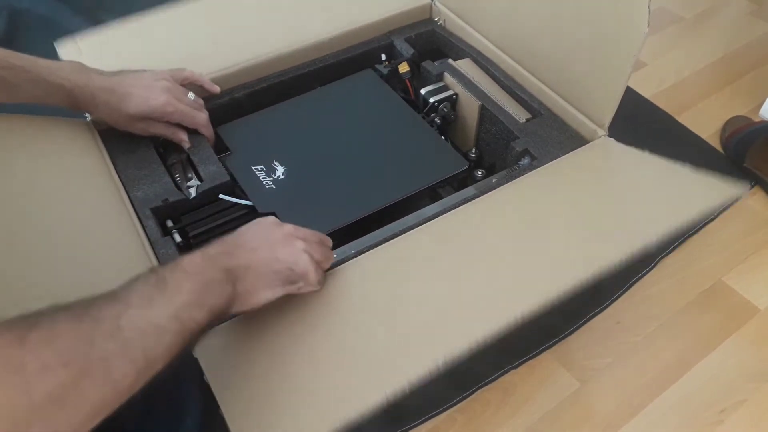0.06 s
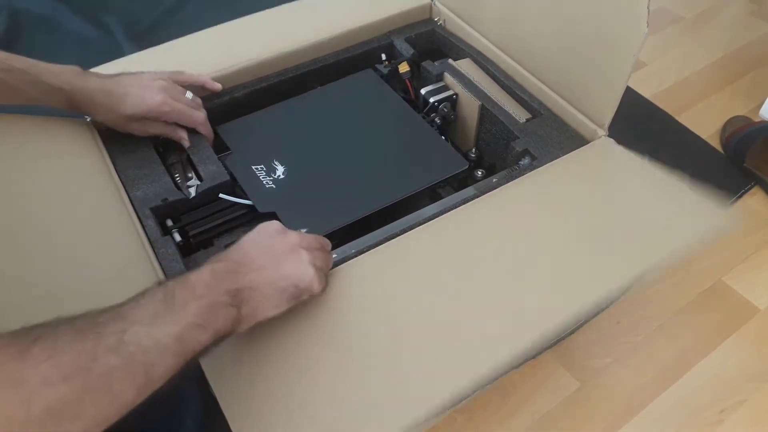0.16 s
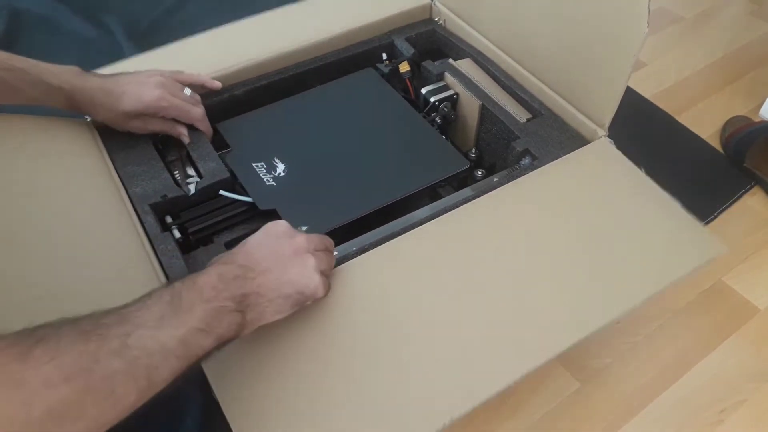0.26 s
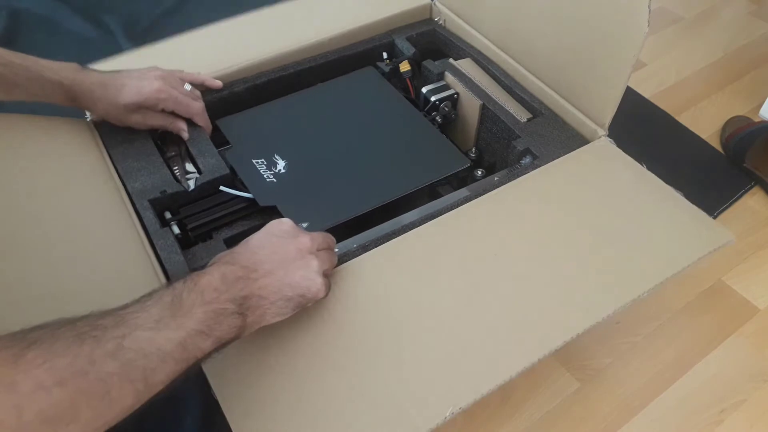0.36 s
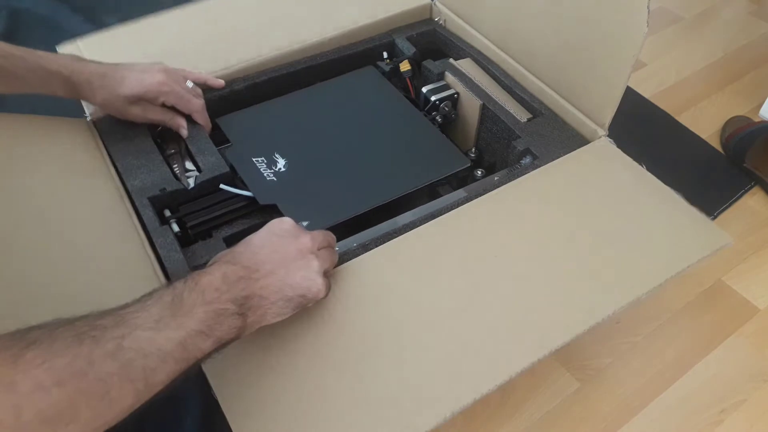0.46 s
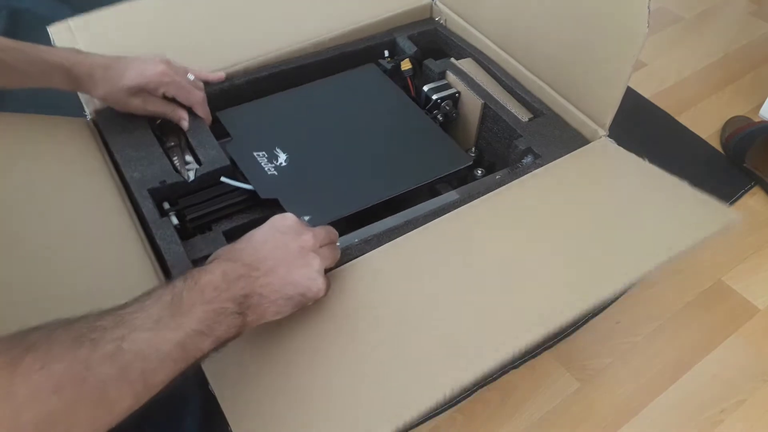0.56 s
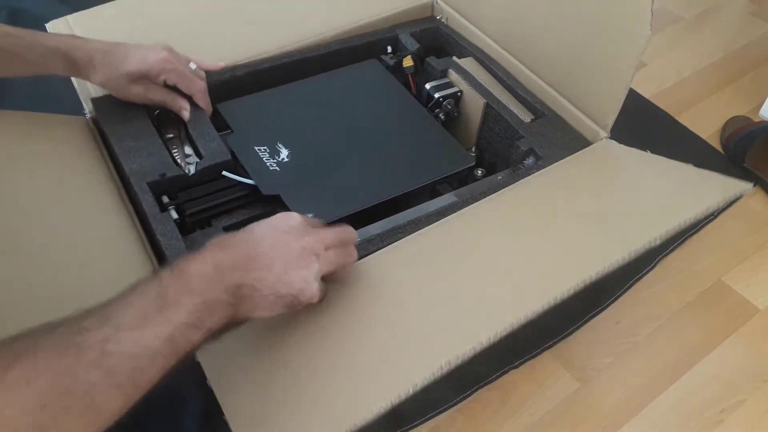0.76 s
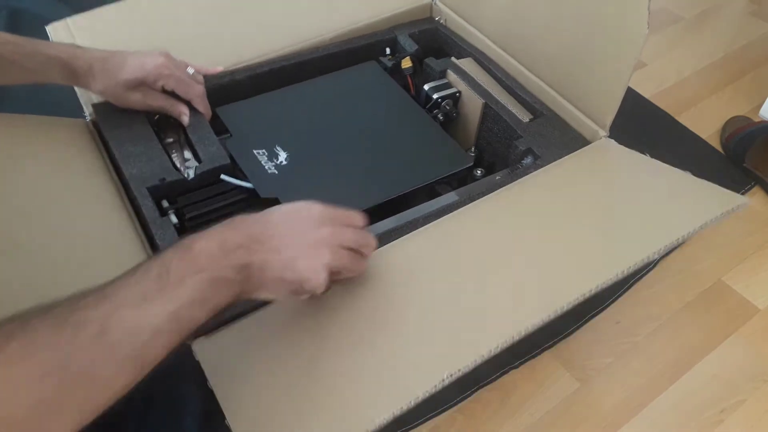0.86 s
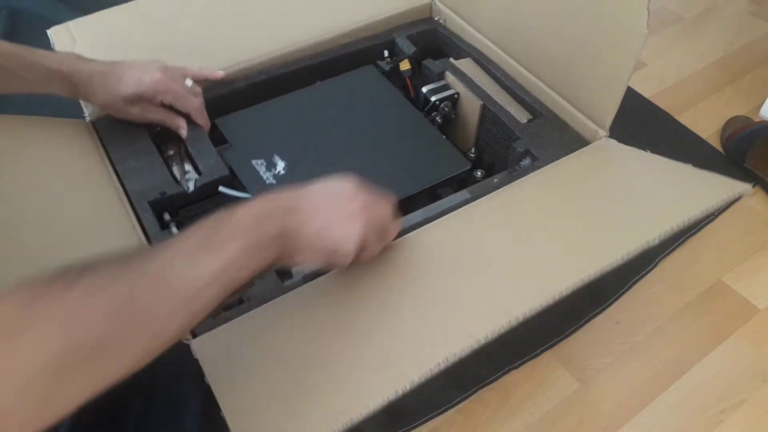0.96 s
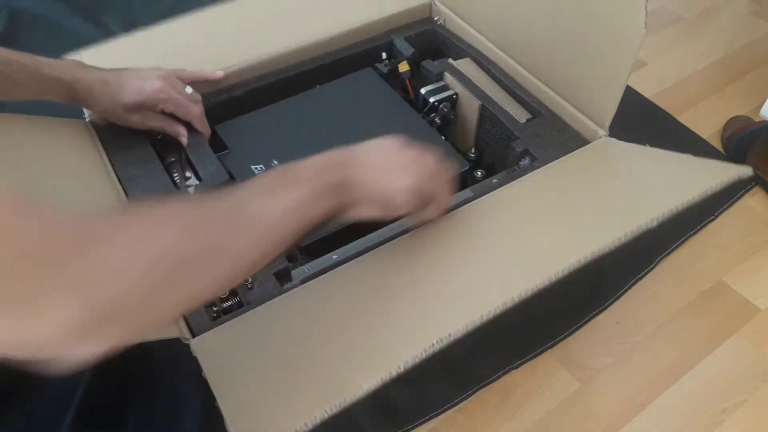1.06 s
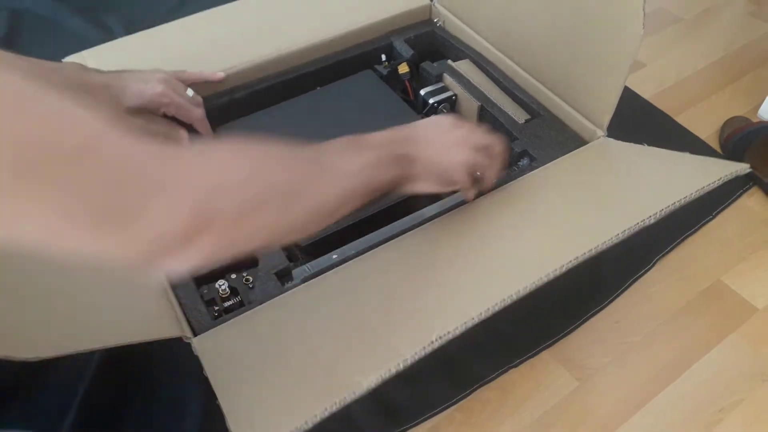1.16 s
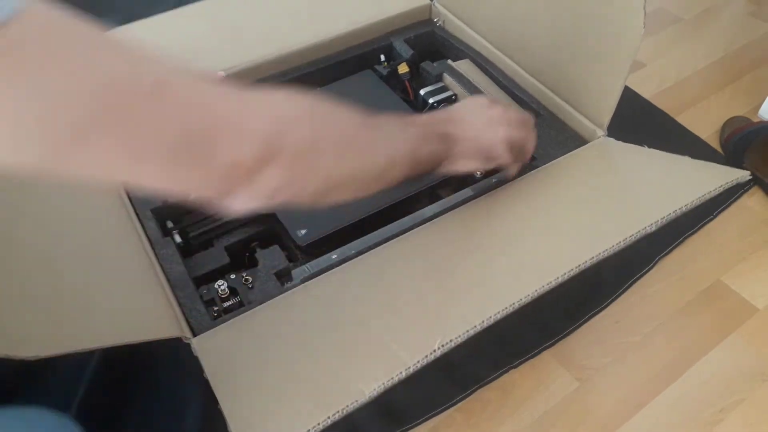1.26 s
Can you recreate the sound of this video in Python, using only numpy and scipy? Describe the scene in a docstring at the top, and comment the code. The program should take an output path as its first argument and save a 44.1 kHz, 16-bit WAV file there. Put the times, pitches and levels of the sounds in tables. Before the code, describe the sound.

Foam scraping on cardboard, heard close in a small, quiet room with a short echo. Faint rubbing opens; at 0.2 seconds a hard, bright snap leads into light knocks and soft box thuds until 0.35. Hollow drags and scraping return around 0.5 to 0.7. A rasp at 0.83 leads to a bright swish peaking near 1.0 with low thuds; a short rasp at 1.13, then faint knock and click near 1.28.

```python
"""Hands work a part loose from foam packing in a cardboard box, in a small room.
Over quiet air noise, foam rubs faintly (random slips); a hard edge snaps (dying sines) and its loudest
snap reflects early, amid light knocks (a blow plus noisy chatter); soft box thuds (slow-starting sines)
begin. Scraping and hollow drags (slips through the cardboard) return, foam catches in a rasp, and a bright
swish (dense slips) swells near 1 s; a second rasp lets go, then a faint knock and snap end it."""
import sys
import numpy as np
from scipy import signal
from scipy.io import wavfile

SR = 44100
rng = np.random.default_rng(int(sys.argv[2]) if len(sys.argv) > 2 else 0)


def store_wav(level_fs):
    """Save 16-bit WAV to argv[1]."""
    pcm = np.round(np.clip(np.atleast_2d(level_fs), -1, 1) * 32767)
    wavfile.write(sys.argv[1], SR, pcm.T.astype(np.int16))


N = 57330  # length in samples


def amp(db):
    """Turns decibels into a plain multiplier."""
    return 10 ** (np.asarray(db) / 20)


def evened(x):
    """Scales a sound to an rms of 1."""
    return x / np.sqrt(np.mean(x ** 2) + 1e-20)


def unit(x):
    """Scales a sound to a total energy of 1."""
    return x / np.sqrt(np.sum(x ** 2) + 1e-20)


def decay(t, t60):
    """Fades by 60 dB in t60 seconds."""
    return np.exp(-np.log(1000) * t / t60)


def read(points, hz):
    """Reads a table at any frequency, with straight lines on a log-frequency axis."""
    table_hz, value = np.transpose(points)
    return np.interp(np.log(hz + 1), np.log(table_hz + 1), value)


def level(points):
    """Turns a table of times and decibels into a gain for every sample."""
    s, db = np.transpose(points)
    return amp(np.interp(np.arange(N) / SR, s, db))


def add(mix, s, sound):
    """Mixes a sound in at s seconds, cutting off what runs past the end."""
    part = mix[round(s * SR):][:len(sound)]
    part += sound[:len(part)]


def colour(x, points, tilt_db=0):
    """Filters to a given spectrum; the tilt in dB per octave pivots at 1 kHz and stops below 200 Hz."""
    hz = abs(np.fft.fftfreq(4096, 1 / SR))
    tilt = tilt_db * np.log2(np.maximum(hz, 200) / 1000)
    log_gain = np.log(amp(read(points, hz) + tilt))
    # Minimum phase: the filter responds as early as it can, never ahead of the sound
    response = np.exp(np.conj(signal.hilbert(log_gain)))
    taps = np.fft.ifft(response).real[:2048]
    return signal.fftconvolve(x, taps)[:len(x)]


def ring(modes):
    """Makes one dying sine for each row of (f/Hz, level/dB, t60/s)."""
    t = np.arange(SR // 4) / SR
    return [amp(db) * decay(t, t60) * np.sin(2 * np.pi * hz * t) for hz, db, t60 in modes]


def slips(per_s, spread_db):
    """Sticking and slipping: tiny impulses of uneven size and random sign, per_s on average."""
    size = amp(spread_db * np.minimum(rng.exponential(1, N), 4))
    sign = rng.choice([-1, 1], N)
    happens = rng.random(N) < per_s / SR
    return evened(size * sign * happens)


# Spectrum of the room's air noise: f/Hz, relative level/dB
AIR_COLOUR = [(20, -34), (35, -14), (55, 0.5), (130, 3), (220, -9), (1000, -10), (4000, -15.5),
              (16000, -12)]
AIR_DB = -69  # rms level


def air():
    """Room tone: steady random noise, shaped to a fixed spectrum."""
    return amp(AIR_DB) * evened(colour(rng.standard_normal(N), AIR_COLOUR))


# How long the room rings: f/Hz, time to fall 60 dB/s
ROOM_DECAY = [(100, 0.78), (700, 0.45), (4000, 0.18), (16000, 0.12)]
ROOM_DB, ROOM_DELAY_S = -15.5, 0.00274  # tail energy; silence before the tail


def room(x):
    """Echoes blur into a short noise tail whose treble dies first."""
    noise = rng.standard_normal(SR // 2)
    hz, t, bands = signal.stft(noise, SR, nperseg=256)
    fading = bands * decay(t, read(ROOM_DECAY, hz)[:, None])
    tail = signal.istft(fading, SR)[1]
    tail = tail * (np.arange(len(tail)) / SR > ROOM_DELAY_S)
    return amp(ROOM_DB) * signal.fftconvolve(x, unit(tail))[:N]


# The box flexing: start t/s, energy level/dB, pitch f/Hz
BOX_THUDS = [(.298, -27.5, 264), (.312, -26.5, 150), (.712, -34.5, 134), (0.811, -29, 154),
             (.873, -20, 197), (.972, -18.5, 238), (0.992, -26.5, 144), (1.095, -30.5, 265)]
# What each thud swings with: multiple of the pitch, relative level/dB
BOX_MODES = [(1, 30), (1.25, -12), (.62, -10)]
THUD_RISE_S, THUD_T60_S = 0.0054, 0.08  # soft start; time to fall 60 dB


def thuds():
    """Soft pushes set the box's low tones swinging, with a gentle start."""
    out = np.zeros(N)
    for s, db, hz in BOX_THUDS:
        swing = sum(ring([(hz * k, mode_db, THUD_T60_S) for k, mode_db in BOX_MODES]))
        t = np.arange(len(swing)) / SR
        rise = 1 - np.exp(-(t / THUD_RISE_S) ** 2)
        add(out, s, amp(db) * unit(swing * rise))
    return out


# Light knocks against the box: start t/s, energy level/dB, tilt/dB per octave
BOX_KNOCKS = [(0.2094, -18.5, 1), (0.2127, -27, 2), (.296, -24, -1), (0.3056, -19.5, -3.5),
              (0.3079, -21, 3), (0.3203, -20, 2.5), (0.3238, -15, 0), (0.3276, -29, 9), (.414, -32, -5),
              (1.2765, -33, 1)]
# Spectrum of a knock before its tilt: f/Hz, relative level/dB
KNOCK_SPECTRUM = [(40, -35), (120, -34), (300, 4), (750, 0), (1800, 3), (3000, -4), (5500, -7.5),
                  (9000, -16.5), (16000, -39)]
CHATTER_T60_S, CHATTER_SHARE = 0.01, 0.61  # share is relative to the first blow


def knocks():
    """Each knock is one blow, with brief noisy chatter where the surfaces touch."""
    out = np.zeros(N)
    t = np.arange(SR // 10) / SR
    for s, db, tilt_db in BOX_KNOCKS:
        chatter = rng.standard_normal(len(t)) * decay(t, CHATTER_T60_S)
        blow = (t == 0) + CHATTER_SHARE * chatter
        add(out, s, amp(db) * unit(colour(blow, KNOCK_SPECTRUM, tilt_db)))
    return out


# Hard edges clicking, and at .2363 the main snap's early reflection off a wall or ceiling:
# start t/s, energy level/dB, tilt/dB per octave
CLICKS = [(.1916, -28, 6), (.224, -2.5, 0), (.2363, -15.5, 0), (1.2895, -33, 1)]
# What a snap rings with: f/Hz, relative level/dB, time to fall 60 dB/s
EDGE_MODES = [(645, -21, 0.019), (890, -19, 0.015), (1250, -22, 0.021), (1850, -14, 0.0072),
              (2570, -18, 0.0068), (3870, -15, 0.0097), (4920, -4.5, 0.0035), (6160, -2, 0.0046),
              (7900, -7, 0.004), (9740, -7.5, 0.0043), (12180, -17, 0.0072), (14700, -8, 0.0018)]
# A small part gives off little bass: f/Hz, relative level/dB
SNAP_SPECTRUM = [(40, -51), (200, -10), (450, 5), (16000, 1.5)]


def snaps():
    """A hard edge clicks as many quickly dying tones; the main snap's reflection repeats them, softer."""
    out = np.zeros(N)
    # Every other tone starts upside down
    click = sum((-1) ** k * mode for k, mode in enumerate(ring(EDGE_MODES)))
    for s, db, tilt_db in CLICKS:
        add(out, s, amp(db) * unit(colour(click, SNAP_SPECTRUM, tilt_db)))
    return out


# Cardboard panel resonances: f/Hz, relative level/dB, time to fall 60 dB/s
PANEL_MODES = [(297, -8, 0.041), (762, 4.5, 0.35), (883, -6, 0.16), (1020, -8.5, 0.039), (1113, 1, 0.12),
               (1234, -17, 0.14), (1520, 2.5, 0.027), (1670, 2, 0.024), (1800, -1.5, 0.1),
               (3900, -20, 0.093)]
PANEL_DB = -29  # gain of the ring that panel() adds


def body(x):
    """What the cardboard panel rings with when x shakes it."""
    tones = zip(PANEL_MODES, ring(PANEL_MODES))
    # The sample-to-sample change of each tone, evened so that only the table sets the balance
    modes = sum(amp(db) * unit(np.diff(tone)) for (_, db, _), tone in tones)
    return signal.fftconvolve(x, unit(modes))[:N]


def panel(x):
    """The cardboard adds its own ring to a sound."""
    return x + amp(PANEL_DB) * body(x)


# Slow drags that ring the panel: middle t/s, peak level/dB, time from peak to 1/e of it/s
SLOW_DRAGS = [(0.017, -63, 0.067), (0.517, -51, 0.062), (0.64, -55, 0.099), (1.207, -54, 0.026)]
# Spectrum of the rubbing before the panel: f/Hz, relative level/dB
DRAG_SPECTRUM = [(100, -24), (290, -8.5), (500, -4), (750, -1.5), (1100, 1.5), (1750, -3.5), (2400, -14),
                 (4000, -12.5), (16000, -23)]
SLIPS_PER_S, SLIP_SPREAD_DB = 5000, 2  # for drags and scrape: average rate, unevenness of size


def drags(ring_share=0.54):
    """Slow, hollow rubbing: slips heard both directly and through the panel's resonances."""
    t = np.arange(N) / SR
    stroke = sum(amp(db) * np.exp(-((t - s) / half_s) ** 2) for s, db, half_s in SLOW_DRAGS)
    grit = evened(colour(slips(SLIPS_PER_S, SLIP_SPREAD_DB), DRAG_SPECTRUM))
    hollow = evened(body(grit))
    return stroke * evened(ring_share * hollow + (1 - ring_share) * grit)


# Foam catching as it is pulled free: peak t/s, peak level/dB, rise/s, tilt/dB per octave
FOAM_CATCHES = [(.83, -39.5, .03, 0), (1.132, -45, .005, 2.5)]
# Spectrum of the rasp before its tilt: f/Hz, relative level/dB
CATCH_SPECTRUM = [(200, -17.5), (1700, -7), (2350, 0.5), (3200, -2.5), (4300, 0), (5500, -9), (16000, -48)]
CATCH_FALL_S = 0.0055  # time to fall to 1/e


def catch():
    """Rasps of fast slips that build as the foam binds and die away as it slips free."""
    out = np.zeros(N)
    for s, db, rise_s, tilt_db in FOAM_CATCHES:
        t = np.arange(N) / SR - s
        grip = np.exp(np.minimum(t / rise_s, -t / CATCH_FALL_S))
        rasp = colour(slips(per_s=9000, spread_db=1.5), CATCH_SPECTRUM, tilt_db)
        out += amp(db) * grip * evened(rasp)
    return out


# Fine swish of foam sliding quickly: t/s, level/dB
SWISH_LEVEL = [(0, -57), (.045, -49), (.1, -58), (.15, -57), (.185, -62.5), (.25, -53), (.35, -58),
               (.43, -66), (.57, -50), (.77, -57.5), (.85, -46), (.92, -41.5), (.982, -34), (1.015, -41),
               (1.06, -43), (1.095, -40), (1.12, -46), (1.18, -55.5), (1.265, -75), (1.3, -62)]
# Spectrum of the swish: f/Hz, relative level/dB
SWISH_SPECTRUM = [(100, -56), (1000, -40), (2500, -9.5), (4200, -3), (6500, -2), (9500, -1.5), (11000, -6),
                  (14000, -8), (16000, -18)]


def swish():
    """The foam's cells flick past so densely that they blend into bright noise."""
    flicks = slips(per_s=14000, spread_db=3)
    return level(SWISH_LEVEL) * evened(colour(flicks, SWISH_SPECTRUM))


UNEVEN_DB, UNEVEN_PER_S = 1.2, 110  # typical size of a random change; new values per second


def pressure():
    """Small random changes in how hard the foam is pressed."""
    knots = rng.standard_normal(1000)
    place = np.arange(N) / SR * UNEVEN_PER_S
    return amp(UNEVEN_DB * np.interp(place, np.arange(len(knots)), knots))


# Foam scraping on cardboard, before pressure and dulling: t/s, level/dB
SCRAPE_LEVEL = [(0, -60), (.06, -63), (.11, -73.5), (.2, -66.5), (.23, -42), (.28, -49.5), (.335, -42.5),
                (.385, -51.5), (.435, -57.5), (.52, -45.5), (.61, -49), (.68, -45), (.77, -51),
                (.85, -46.5), (.93, -37.5), (.985, -37.5), (1.04, -40), (1.1, -51), (1.17, -57),
                (1.21, -52), (1.26, -61.5), (1.3, -57)]
# Spectrum of the scrape at full treble: f/Hz, relative level/dB
SCRAPE_SPECTRUM = [(25, -22), (55, -20), (90, -17), (140, -13), (280, -0.5), (600, -1), (800, 3),
                   (1700, 0.5), (2400, -0.5), (4200, -0.5), (7000, -7.5), (11000, -19), (16000, -16)]
# Below this level, the sound above DULL_HZ loses DULL_SHARE extra dB for each dB of level
DULL_BELOW_DB, DULL_SHARE, DULL_HZ = -49.5, 0.53, 2150


def scrape():
    """Coarse slips of foam on cardboard, losing treble when the rubbing is slow and quiet."""
    grit = evened(colour(slips(SLIPS_PER_S, SLIP_SPREAD_DB), SCRAPE_SPECTRUM))
    low_pass = signal.butter(4, DULL_HZ, fs=SR, output="sos")
    low = signal.sosfiltfilt(low_pass, grit)
    effort = level(SCRAPE_LEVEL)
    treble = np.minimum(effort / amp(DULL_BELOW_DB), 1) ** DULL_SHARE
    return effort * pressure() * (low + treble * (grit - low))


def scene():
    """All handling sounds with their room echo, over quiet air noise."""
    on_cardboard = panel(scrape() + knocks())
    near = on_cardboard + drags() + snaps() + thuds() + swish() + catch()
    return (near + room(near) + air())[None]


LOW_CUT_HZ, EDGE_HZ = 29, 15950  # lower and upper limits of what is picked up


def record(dry):
    """The microphone's low cut and the recorder's upper band limit."""
    low_cut = signal.butter(4, LOW_CUT_HZ, "high", fs=SR, output="sos")
    lean = signal.sosfilt(low_cut, dry)
    band_limit = signal.firwin(401, EDGE_HZ, window=("kaiser", 8), fs=SR)
    return signal.oaconvolve(lean, band_limit[None], "same")


dry = scene()
out = record(dry)
store_wav(out)
```